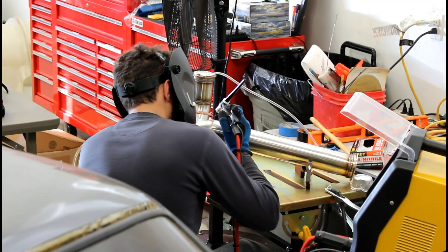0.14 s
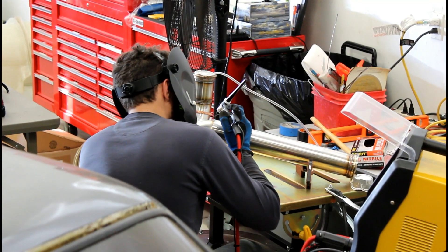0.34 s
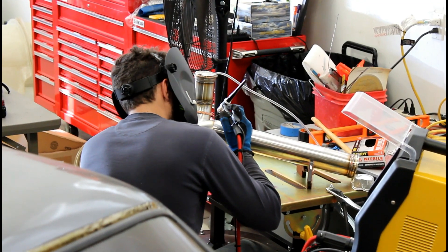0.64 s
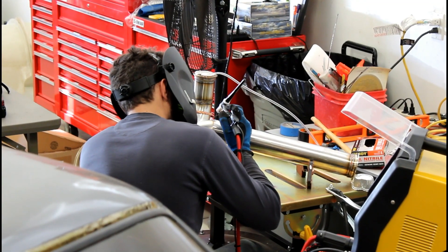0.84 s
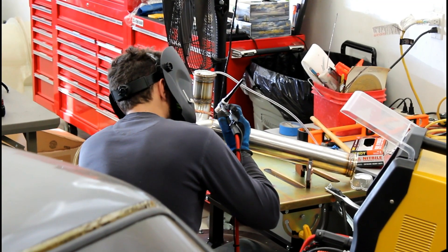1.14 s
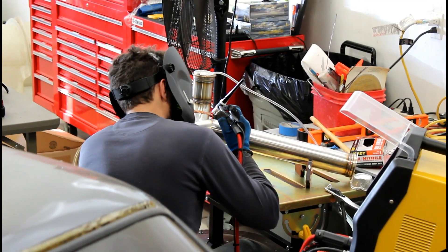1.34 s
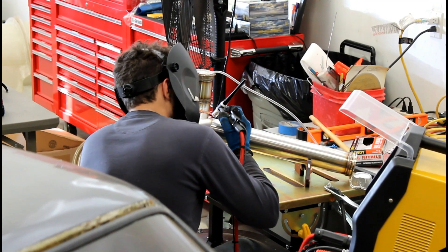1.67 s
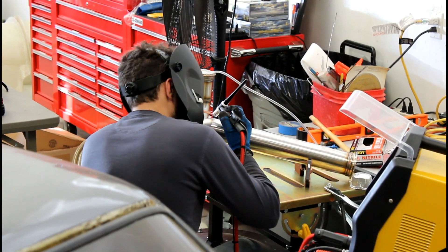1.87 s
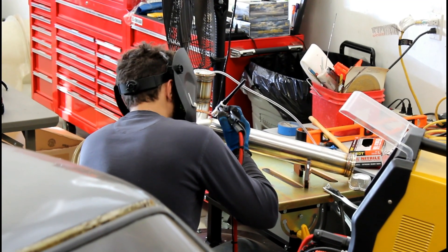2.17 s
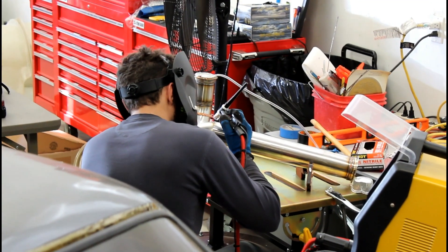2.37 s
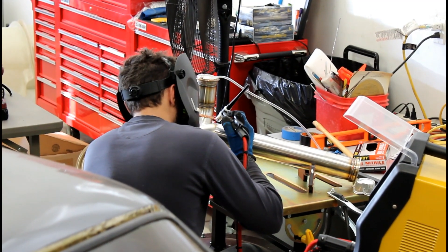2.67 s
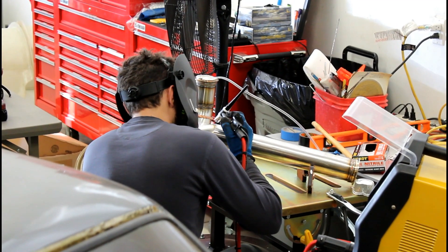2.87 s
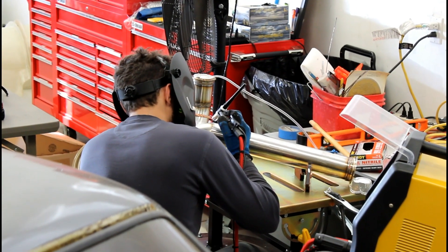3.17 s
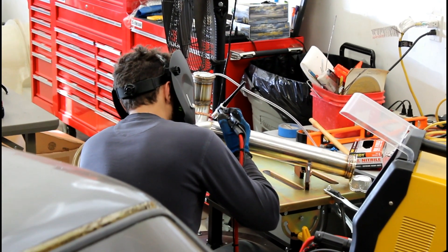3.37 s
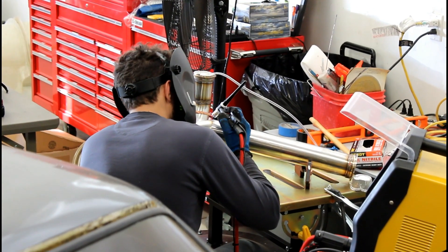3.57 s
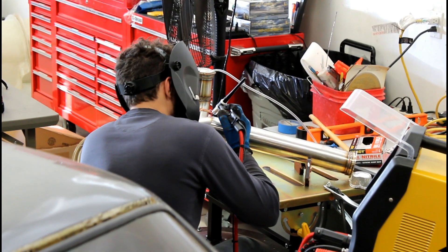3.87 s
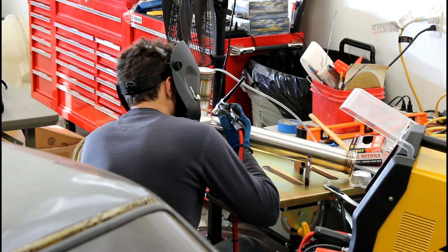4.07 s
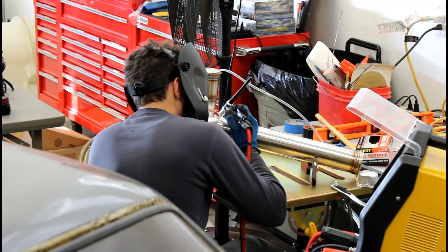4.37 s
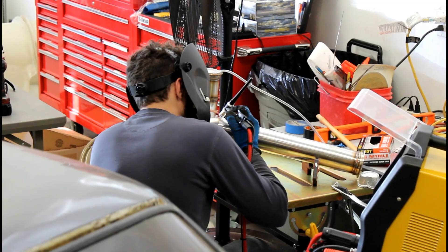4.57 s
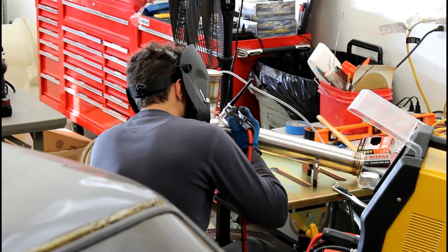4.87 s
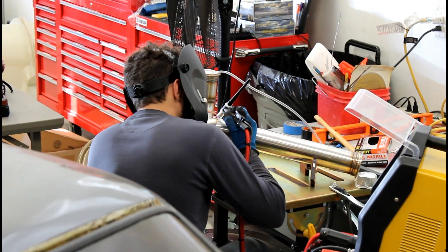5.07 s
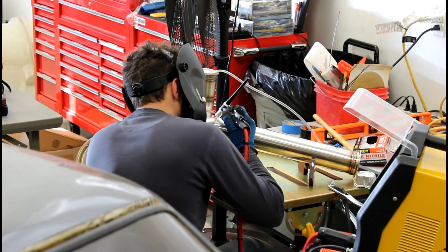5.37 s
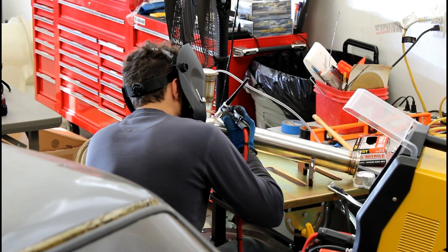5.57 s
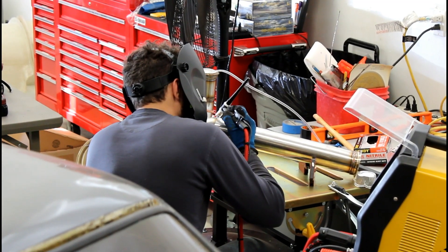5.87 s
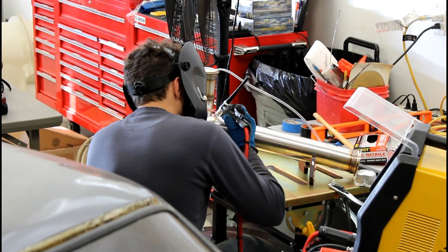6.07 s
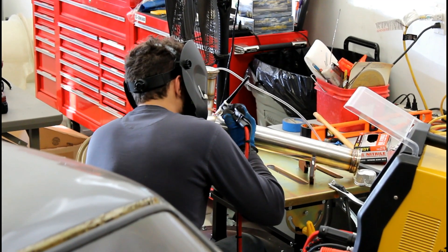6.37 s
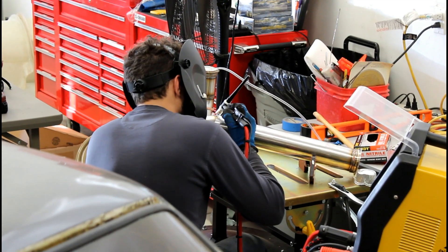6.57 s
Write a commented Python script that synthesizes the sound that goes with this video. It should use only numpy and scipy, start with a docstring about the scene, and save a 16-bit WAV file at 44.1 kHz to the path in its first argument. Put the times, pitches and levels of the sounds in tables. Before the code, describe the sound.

In a hard-walled garage a welding machine's fan drones steadily. Two light metallic scrapes ring at the start, then a grinder is flicked on for an instant, rattling and dying away. After two seconds it clacks, spins up quickly and runs to the end in a loud harsh hiss with a wavering high whine. Steel sings and squeals more and more. Close, nearly mono camera microphone, with bass ducking when loud.

```python
"""Angle grinder in a garage

A welder's cooling fan drones. Out of sight an angle grinder scrapes on steel, is blipped once, then spins up and runs.
Shaped noise makes fan air, gear rattle and rush; sines locked to the rotor make a whine that sags under load.
Drifting tones ring the disc and the steel. Loose knocks and squeals come on top, with the garage's echo.
The near-mono camera microphone turns its bass down while the noise is loud.
"""
import sys
import numpy as np
from scipy import signal
from scipy.fft import rfft, irfft, next_fast_len
from scipy.io import wavfile
from scipy.ndimage import map_coordinates

SR = 44100
rng = np.random.default_rng(int(sys.argv[2]) if len(sys.argv) > 2 else 0)


def store_wav(level_fs):
    """Save 16-bit WAV to argv[1]."""
    pcm = np.round(np.clip(np.atleast_2d(level_fs), -1, 1) * 32767)
    wavfile.write(sys.argv[1], SR, pcm.T.astype(np.int16))


N = 296793  # samples


def amp(db):
    """Decibels to gain."""
    return 10 ** (np.asarray(db) / 20)


def unit(x):
    """Scale to rms 1."""
    return x / np.sqrt(np.mean(x ** 2) + 1e-20)


def along(points, hz):
    """Read (frequency, value) points on a log frequency axis."""
    f, v = np.transpose(points)
    return np.interp(np.log(hz + 1), np.log(f + 1), v)


def curves(rows):
    """Give one value per sample for each column after the time."""
    s, *columns = np.transpose(rows)
    return [np.interp(np.arange(N) / SR, s, column) for column in columns]


def after(start, rise):
    """Ramp from 0 at start to 1 rise seconds later."""
    return np.clip((np.arange(N) / SR - start) / rise, 0, 1)


def swell(t, rise, t60):
    """A soft rise to 1 at t = 0, then an even decay in decibels."""
    return np.exp(-.5 * (np.minimum(t, 0) / rise) ** 2) * amp(-60 * np.maximum(t, 0) / t60)


def wobble(rate):
    """A smooth random curve with rate knots a second."""
    knots = rng.standard_normal(int(N * rate / SR) + 4)
    return map_coordinates(knots, [np.arange(N) * rate / SR], order=2)


def filtered(x, response):
    """Multiply the spectrum of x by a response of frequency."""
    size = next_fast_len(N + SR // 4)
    return irfft(rfft(x, size) * response(np.fft.rfftfreq(size, 1 / SR)), size)[:N]


def coloured(x, spectrum):
    """Shape x by a spectrum and scale it to rms 1."""
    return unit(filtered(x, lambda hz: amp(along(spectrum, hz))))


def grit(rate, share):
    """Noise in which a share of the power is tiny impacts, rate of them a second."""
    impacts = (rng.random(N) < rate / SR) * rng.choice([-1, 1], N) * rng.uniform(0.72, 1, N)
    share = np.clip(share, 0, 1)
    return np.sqrt(share) * unit(impacts) + np.sqrt(1 - share) * rng.standard_normal(N)


def tones(lines, width_hz, waver_db):
    """A sum of (frequency, rms level) tones, each drifting in phase and strength on its own."""
    t = np.arange(N) / SR
    knots = np.linspace(0, N / SR, 400)
    total = np.zeros(N)
    for hz, db in lines:
        slow = signal.resample(rng.standard_normal((2, 50)), len(knots), axis=1)
        phase = np.cumsum(slow[0]) * width_hz * knots[1]
        strength = amp(db) * unit(amp(waver_db * slow[1]))
        total += np.interp(t, knots, strength) * np.sin(2 * np.pi * (hz * t + np.interp(t, knots, phase)))
    return np.sqrt(2) * total


# Rotor speed once it is up, sagging under load: (time [s], speed [turns/s])
RUNNING_SPEED = [(3.15, 469.5), (3.4, 472), (3.55, 468), (3.8, 473), (4.0, 480), (4.35, 482), (4.77, 477),
                 (4.97, 487), (5.25, 489), (5.45, 481), (5.58, 471.5), (5.85, 466.5), (6.27, 472.5),
                 (6.55, 468), (6.72, 459)]
SWITCH_ON_S, SPIN_UP_S = 2.06, .295  # motor switched on; time constant of the spin-up
SPIN_UP_GAP = 336  # size of the exponential, turns/s


def rotor_speed():
    """Turns a second: an exponential spin-up that joins the running speed."""
    running, = curves(RUNNING_SPEED)

    def missing(s):
        return SPIN_UP_GAP * np.exp(-np.maximum(s - SWITCH_ON_S, 0) / SPIN_UP_S)

    # less the remainder at the first running point, so that the two meet there
    gap = missing(np.arange(N) / SR) - missing(RUNNING_SPEED[0][0])
    return running - np.maximum(gap, 0)


# The running grinder's noise, before a small trim and flicker:
# (time [s], level [dB], treble level, heard as swings about its mean [dB])
HISS = [(2.3, -20.5, -20.5), (2.53, -19, -23), (2.71, -19.5, -24.5), (3.27, -19.5, -18), (3.38, -20, -24.5),
        (3.46, -19.5, -16), (3.83, -19.5, -23.5), (4.69, -19.5, -20.5), (4.81, -21, -25.5),
        (4.98, -20, -26), (5.03, -20.5, -20), (5.12, -19, -26.5), (5.4, -20.5, -17.5), (5.61, -21, -21),
        (5.76, -20.5, -15), (5.94, -20, -21.5), (6.45, -21.5, -16.5), (6.72, -23, -12.5)]
# Air and abrasive rush: (frequency [Hz], relative density [dB per Hz])
RUSH_SPECTRUM = [(150, -36), (260, -25), (500, -12), (1000, -8), (1600, -4), (2000, -8.5), (3300, -0.5),
                 (5000, -1), (6300, -5.5), (8300, -11.5), (9600, -20), (11600, -25), (12600, -37),
                 (13700, -54)]
# Rattling gears, also heard in the blip and the clacks: (frequency [Hz], relative density [dB per Hz])
GEAR_SPECTRUM = [(300, -41), (1000, -16), (1300, -8), (1550, -1.5), (1750, -5.5), (2150, -3.5),
                 (2600, -4.5), (2950, -1), (3400, 0), (3700, -3.5), (4150, 3), (4600, -1), (5100, 0.5),
                 (5800, -10), (6550, -6), (7100, -13), (8000, -13.5), (10000, -28), (11500, -53),
                 (13000, -80)]
# The noise grows as a power of the speed, up to LOUD_SPEED in turns/s
LOUD_SPEED, LOUD_POWER = 243, 3.2
TREBLE_DB, TREBLE_SWING = 1, 0.98  # lift at full speed; share of the treble's swing that is heard
SLOW_TREBLE_DB = -2  # the treble is duller at low speed
LOW_PASS_HZ = 10200  # the hiss is low-passed here at first and opens as the rotor speeds up
BODY_DB, BODY_RISE_DB_PER_S = 0.3, 0.05  # lift of the low body at switch-on, and its slow growth


def grinder_noise():
    """Gears rattle at low speed; the rush of air and abrasive takes over as the rotor gets going."""
    speed = rotor_speed()
    level_db, treble_db = curves(HISS)
    airy = (speed / speed.max()) ** 2.0
    rattle = coloured(garage(grit(rate=210, share=0.28), wet=0.43), GEAR_SPECTRUM)
    rush = coloured(garage(grit(rate=800, share=0.28), wet=0.24), RUSH_SPECTRUM)
    noise = np.sqrt(1 - airy) * rattle + np.sqrt(airy) * rush
    dull = filtered(noise, lambda hz: 1 / (1 + (hz / LOW_PASS_HZ) ** 20))
    noise = dull + airy ** 2 * (noise - dull)

    # the contact shifts weight between the low body and the top of the hiss
    body = filtered(noise, lambda hz: 1 / (1 + (hz / 2300) ** 6))
    treble = filtered(noise, lambda hz: 1 - 1 / (1 + (hz / 6700) ** 10))
    body_gain = amp(BODY_DB + BODY_RISE_DB_PER_S * (np.arange(N) / SR - SWITCH_ON_S))
    treble_swing_db = treble_db - np.mean(HISS, axis=0)[2]
    fast_treble_db = TREBLE_DB + TREBLE_SWING * treble_swing_db
    treble_gain = amp((1 - airy) * SLOW_TREBLE_DB + airy * fast_treble_db)
    noise = noise + (body_gain - 1) * body + (treble_gain - 1) * treble

    loudness = after(SWITCH_ON_S, 0.0044) * np.minimum(speed / LOUD_SPEED, 1) ** LOUD_POWER
    flicker_db = 0.6 * wobble(22.01)
    return loudness * amp(level_db + 0.11 + flicker_db) * noise


# The whine swells and fades as the tool is turned, before flutter: (time [s], level [dB])
WHINE_LEVEL = [(2.25, -32), (2.46, -26.5), (2.65, -31), (2.8, -28), (2.9, -32.5), (3.17, -31), (3.28, -36),
               (3.41, -25), (3.47, -42), (3.58, -38), (3.68, -27), (3.77, -26.5), (3.84, -34), (4.0, -30),
               (4.19, -42), (4.27, -28), (4.36, -28), (4.55, -39), (4.73, -28.5), (4.78, -33),
               (4.88, -29.5), (5.15, -33.5), (5.72, -32), (5.83, -41), (6.08, -38), (6.17, -29.5),
               (6.44, -28.5), (6.72, -38)]
# The whine's octave, before flutter: (time [s], level [dB])
OCTAVE_LEVEL = [(2.17, -40), (2.33, -36), (2.45, -42), (2.55, -40.5), (2.85, -45), (3.02, -55), (3.18, -46),
                (3.42, -46), (3.6, -56), (3.72, -46.5), (4.0, -47), (4.12, -57), (5.2, -57), (5.7, -52.5),
                (6.5, -54), (6.7, -48)]
# Hum at full speed, before flutter: (time [s], shaft [dB], gear mesh [dB], shaft's octave [dB])
SHAFT_HUM = [(2.5, -42, -50, -54), (2.85, -54, -52, -54), (3.3, -41, -42, -54), (3.68, -41, -38, -54),
             (3.9, -38.5, -50, -44), (4.06, -50, -52, -38.5), (4.22, -47, -50, -41.5),
             (4.4, -44, -38.5, -42), (4.68, -40.5, -48, -40.5), (4.95, -46, -50, -45),
             (5.45, -52, -54, -44), (5.7, -58, -52, -54), (6.35, -58, -56, -54), (6.65, -54, -45, -54)]
# Gear mesh tones: (multiple of the rotor speed, level against the mesh level [dB])
MESH_ORDERS = [(1.62, 0), (3.24, -3), (4.86, 0)]
SLOTS = 12  # armature slots: the whine's multiple of the rotor speed
RUN_JITTER, SPIN_UP_JITTER = .0011, .062  # share of the speed: always, and added while slow
WHINE_FLUTTER_DB = 1.4


def whine():
    """Orders of the rotor, ragged while it gathers speed: slots whine with their octave, shaft and gears hum."""
    speed = rotor_speed()
    pace = speed / speed.max()
    unsteady = RUN_JITTER + SPIN_UP_JITTER * (1 - pace) * (1 - after(2.69, 0.48))
    turns = np.cumsum(speed * (1 + unsteady * wobble(300) + 0.000446 * wobble(9))) / SR

    def order(multiple, db):
        strength = amp(db + WHINE_FLUTTER_DB * wobble(28))
        return strength * np.sqrt(2) * np.sin(2 * np.pi * multiple * turns)

    slots = order(SLOTS, curves(WHINE_LEVEL)[0]) + order(2 * SLOTS, curves(OCTAVE_LEVEL)[0])
    shaft_db, mesh_db, octave_db = curves(SHAFT_HUM)
    shaft = order(1, shaft_db) + order(2, octave_db)
    mesh = sum(order(multiple, mesh_db + db) for multiple, db in MESH_ORDERS)
    return after(SWITCH_ON_S, 0.18) * (garage(slots, wet=0.1) + pace ** 4 * (shaft + mesh))


# How hard the disc bites, as the level of the singing steel: (time [s], level [dB])
BITE = [(2.9, -78), (3.3, -34), (3.9, -45), (4.5, -41), (4.95, -41), (5.33, -39), (5.8, -34), (6.6, -37),
        (6.73, -32)]
# Ringing modes of the disc: (frequency [Hz], relative level [dB])
DISC_MODES = [(1605, -5), (1671, -7), (2201, -6.5), (2750, -7), (3122, -10), (3338, -4), (3401, -6),
              (3591, -8), (3919, -8), (4307, -12), (4479, -6), (5055, -9), (5120, -9), (5351, -11)]
# Ringing modes of the steel: (frequency [Hz], relative level [dB])
STEEL_MODES = [(4882, -10), (4973, -7), (5034, 2), (5508, 1), (5668, 0), (5883, 1), (6124, -9), (6334, 0),
               (6569, 3), (6831, 3), (7074, -12), (7122, -7), (7278, -18), (7580, -6), (7838, -2),
               (8021, -11), (8140, -3), (8356, -10), (8465, -15), (8630, -12), (8726, -17), (9092, -20),
               (9539, -20), (9690, -14)]
DISC_RING_DB, DISC_FOLLOWS = -37, 0.17  # disc's ring at the mean bite; dB more for each dB of bite


def contact():
    """The harder the running disc bites, the more it rings and sets the steel singing."""
    bite_db, = curves(BITE)
    disc_db = DISC_RING_DB + DISC_FOLLOWS * (bite_db - np.mean(BITE, axis=0)[1])
    disc = amp(disc_db) * unit(tones(DISC_MODES, width_hz=12, waver_db=2.0))
    steel = amp(bite_db) * unit(tones(STEEL_MODES, width_hz=5, waver_db=3.5))
    return after(2.6, 0.35) * (disc + steel)


# The disc catches and one mode squeals:
# (time of the middle [s], frequency [Hz], rms level before flutter [dB], length [s])
SQUEALS = [(.02, 2751, -42, .02), (.035, 3402, -45.5, .04), (.03, 1605, -45, .03), (.03, 5039, -47, .03),
           (.03, 7117, -45, .04), (.15, 2205, -38.5, .03), (.15, 2750, -41.5, .025),
           (.17, 3338, -42.5, .04), (.195, 3591, -42, .045), (.16, 4484, -47, .05), (.16, 5120, -47.5, .04),
           (2.21, 2800, -31, .015), (2.264, 2950, -31.5, .025), (2.8, 2205, -36, .02),
           (2.8, 6569, -36, .027), (3.9, 8465, -36, .07), (4.349, 2195, -32, .02), (4.54, 2185, -36, .26),
           (5.28, 6334, -33, .09), (5.3, 5389, -34, .05), (5.335, 2205, -29, .035),
           (5.42, 2200, -34.5, .09), (5.5, 2360, -36, .02), (5.33, 6124, -31.5, .02),
           (5.355, 4882, -28.5, .06), (5.452, 8700, -41, .13), (5.54, 6334, -33.5, .06),
           (5.52, 5883, -34, .05), (5.59, 4882, -33, .03), (5.708, 6831, -31, .012), (5.72, 8356, -36, .08),
           (5.78, 7580, -34.5, .12), (5.79, 8630, -40, .06), (5.835, 4973, -28.5, .05),
           (5.84, 5883, -31, .1), (5.975, 6124, -36, .03), (6.005, 6569, -31.5, .02),
           (6.035, 4882, -28.5, .04), (6.11, 8356, -37, .11), (6.26, 7838, -36, .05),
           (6.28, 3338, -33, .04), (6.29, 6569, -32, .04), (6.37, 4882, -30, .1), (6.39, 6569, -32, .03),
           (6.39, 6831, -34.5, .05), (6.4, 5034, -28.5, .06), (6.42, 6334, -32.5, .04),
           (6.46, 7580, -37, .16), (6.48, 6124, -32, .14), (6.55, 6569, -32.5, .03),
           (6.555, 6831, -28.5, .03), (6.59, 8356, -33, .16), (6.64, 5508, -34.5, .09),
           (6.685, 3591, -29.5, .05)]
SQUEAL_RISE_S, SQUEAL_T60_S = 0.018, 0.28
SQUEAL_FLUTTER_RAD, SQUEAL_FLUTTER_DB = .45, 1.5  # random swing of phase and of level


def squeals():
    """A catch feeds one mode for as long as it lasts; then the mode rings out, fluttering."""
    total = np.zeros(N)
    knots = np.linspace(-.5, .5, 45)
    for s, hz, db, length in SQUEALS:
        middle = round(s * SR)
        at = np.arange(max(middle - SR // 2, 0), min(middle + SR // 2, N))
        t = at / SR - s
        phase, strength = (np.interp(t, knots, row) for row in rng.standard_normal((2, len(knots))))
        # time outside the catch: zero for as long as it lasts
        outside = t - np.clip(t, -length / 2, length / 2)
        envelope = swell(outside, SQUEAL_RISE_S, SQUEAL_T60_S)
        tone = np.sin(2 * np.pi * hz * t + SQUEAL_FLUTTER_RAD * phase)
        total[at] += amp(db + SQUEAL_FLUTTER_DB * strength) * envelope * tone
    return np.sqrt(2) * total


# The idle disc brushes the steel: (time [s], level before the scrape's and rings' own gains [dB])
TOUCHES = [(.012, -31), (.152, -33)]
# Scraping noise: (frequency [Hz], relative density [dB per Hz])
SCRAPE_SPECTRUM = [(500, -40), (1100, -10), (1650, 0), (2000, -2.5), (3300, 1.5), (5200, -2), (6000, -3.5),
                   (8200, -7.5), (9500, -16.5), (11500, -27), (13000, -52)]
TOUCH_RISE_S, SCRAPE_T60_S, TOUCH_RING_T60_S = 0.029, 1, 2.1
SCRAPE_DB, TOUCH_DISC_DB, TOUCH_STEEL_DB = 1, -7, -14  # against the touch level


def touches():
    """Each brush against the steel is a short scrape that leaves both ringing."""
    t = np.arange(N) / SR

    def envelope(t60):
        return np.sqrt(sum((amp(db) * swell(t - s, TOUCH_RISE_S, t60)) ** 2 for s, db in TOUCHES))

    scrape = amp(SCRAPE_DB) * coloured(grit(rate=690, share=0.12), SCRAPE_SPECTRUM)
    disc = amp(TOUCH_DISC_DB) * unit(tones(DISC_MODES, width_hz=14, waver_db=3))
    steel = amp(TOUCH_STEEL_DB) * unit(tones(STEEL_MODES, width_hz=4, waver_db=2.5))
    return envelope(SCRAPE_T60_S) * scrape + envelope(TOUCH_RING_T60_S) * (disc + steel)


BLIP_S, BLIP_ATTACK_S, BLIP_HOLD_S, BLIP_T60_S = .509, 0.02, 0.059, 0.9  # hold counts from the start
BLIP_DB = -28.5


def blip():
    """One flick of the switch jerks the gears, and the rattle dies away in the room."""
    coasting = np.maximum(np.arange(N) / SR - BLIP_S - BLIP_HOLD_S, 0)
    rattle = coloured(garage(grit(rate=270, share=0.49), wet=0.52), GEAR_SPECTRUM)
    return after(BLIP_S, BLIP_ATTACK_S) * amp(BLIP_DB - 60 * coasting / BLIP_T60_S) * rattle


# The starting motor jerks the gear case: (time [s], level [dB])
JERKS = [(.575, -36.5), (2.17, -27.5)]
# The gear case's resonance: (frequency [Hz], relative density [dB per Hz])
CASE_SPECTRUM = [(2600, -30), (3600, -7), (4100, 0), (4550, -3), (5500, -30)]
CASE_RISE_S, CASE_T60_S = .025, 0.95


def gear_case():
    """Each start of the motor leaves the gear case ringing in one broad resonance."""
    t = np.arange(N) / SR
    envelope = sum(amp(db) * swell(t - s, CASE_RISE_S, CASE_T60_S) for s, db in JERKS)
    return envelope * coloured(rng.standard_normal(N), CASE_SPECTRUM)


# Slack gears and grit knock: (time [s], level before the trim, gear colour and room [dB])
CLACKS = [(0.5218, -9.5), (.527, -16), (.549, -11), (2.061, -4), (2.087, -9), (2.14, -10), (2.177, -15),
          (2.209, -11), (2.3075, 1.5)]


def clacks():
    """Short knocks in the gear case: noise bursts that die within milliseconds."""
    t = np.arange(SR // 20) / SR
    knocks = np.zeros(N)
    for s, db in CLACKS:
        burst = amp(db - 0.5 - 60 * t / 0.019) * rng.standard_normal(len(t))
        knocks[round(s * SR):][:len(t)] += burst
    return garage(filtered(knocks, lambda hz: amp(along(GEAR_SPECTRUM, hz))), wet=0.4)


# Air noise of the welder's fan: (frequency [Hz], relative density [dB per Hz])
FAN_SPECTRUM = [(25, -36), (60, -30), (110, -20), (165, -15), (235, 3.5), (340, -4.5), (470, -2.5),
                (660, 1), (1000, -3), (2000, -6), (4300, -10), (6500, -17.5), (9000, -32), (13000, -55)]
# Fan and mains tones, ahead of the microphone: (frequency [Hz], rms level [dB])
FAN_HUM = [(60, -79), (80, -76), (120, -71.5), (243, -57), (285, -56), (344.5, -59), (407, -51), (417, -48),
           (532, -53), (797, -50), (834, -56.5), (1062, -57), (1192, -59), (1394, -60), (1598, -59),
           (1627, -60), (1669, -60)]


def fan():
    """The welder's fan: steady air noise and tones of even level that drift slightly in pitch."""
    air = amp(-37.5) * coloured(rng.standard_normal(N), FAN_SPECTRUM)
    return air + tones(FAN_HUM, width_hz=0.39, waver_db=0.0)


# Reverberation of the garage: (frequency [Hz], t60 [s])
GARAGE_T60 = [(200, 0.6), (3000, 0.43), (11000, 0.41)]


def garage(x, wet):
    """Send a share of the power of x back from the walls as a decaying noise tail."""
    hz, t, z = signal.stft(rng.standard_normal(SR * 2 // 3), SR, nperseg=256)
    decay = amp(-60 * t / along(GARAGE_T60, hz)[:, None])
    tail = signal.istft(z * decay, SR, nperseg=256)[1]
    wet = np.clip(wet, 0, 1)
    echo = signal.fftconvolve(x, tail / np.linalg.norm(tail))[:N]
    return np.sqrt(1 - wet) * x + np.sqrt(wet) * echo


# Difference between the microphone's two ports: (frequency [Hz], side against mid [dB])
SIDE_SPECTRUM = [(60, -4), (130, 6), (250, -2), (500, -15.5), (900, -19), (1500, -30.5), (6000, -25.5),
                 (9000, -21.5), (11000, -13.5), (13000, 0)]


def scene():
    """The fan sits dead centre; the grinder's diffuse sound differs a little between two close ports."""
    tool = grinder_noise() + blip() + gear_case() + whine()
    tool = tool + touches() + contact() + squeals() + clacks()
    side = filtered(garage(tool, wet=1), lambda hz: amp(along(SIDE_SPECTRUM, hz)))
    balance_db = np.array([[-.25], [.25]])
    return fan() + np.array([tool + side, tool - side]) * amp(balance_db)


# The camera microphone's gain when fully loud: (frequency [Hz], gain [dB])
LOUD_GAIN = [(40, -36), (90, -42), (140, -20), (200, -10), (420, -9.5), (800, -10), (2000, 0)]
TOP_HZ = 13750  # band limit


def record(dry):
    """A slow gain control pulls the bass down while the input is loud; nothing passes the band limit."""
    hz, t, z = signal.stft(dry, SR, nperseg=2048)
    level = np.sqrt(np.sum(np.abs(z) ** 2, axis=(0, 1)))
    loud = np.clip((level / np.quantile(level, .7) - .4) / 0.59, 0, 1)
    step = 1 - np.exp(-t[1] / 0.58)  # 0.58 s time constant
    held = signal.lfilter([step], [1, step - 1], loud)
    gain = amp(along(LOUD_GAIN, hz)[:, None] * held)
    out = signal.istft(z * gain, SR, nperseg=2048)[1][:, :N]
    return np.array([filtered(channel, lambda hz: hz < TOP_HZ) for channel in out])


dry = scene()
out = record(dry)
store_wav(out)
```